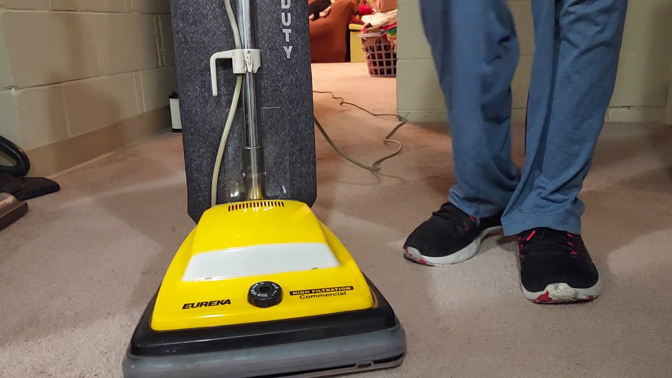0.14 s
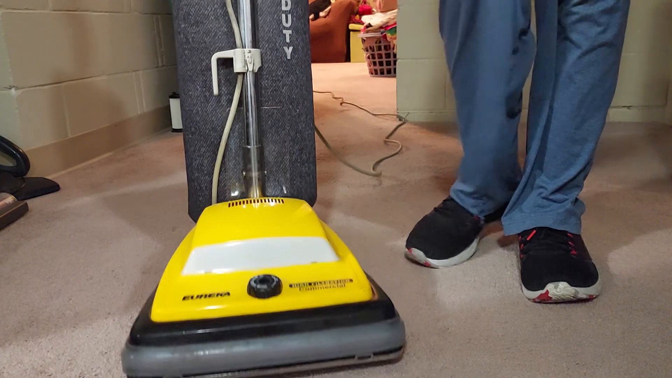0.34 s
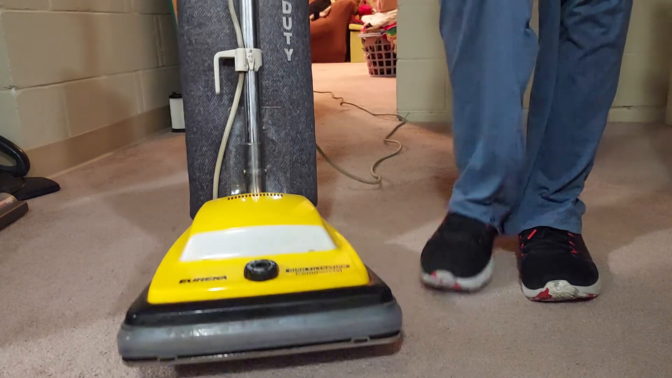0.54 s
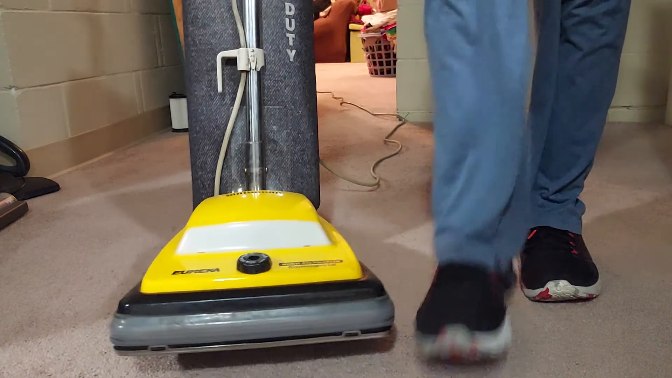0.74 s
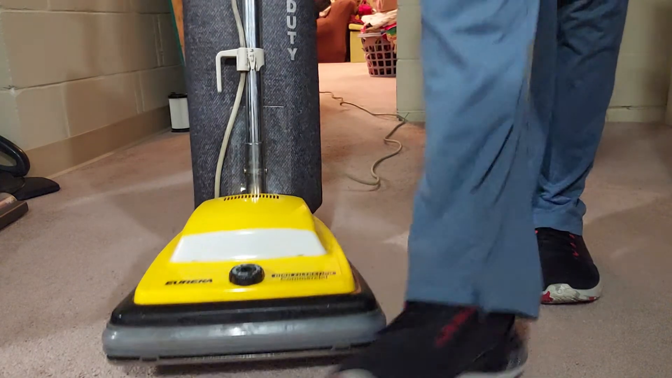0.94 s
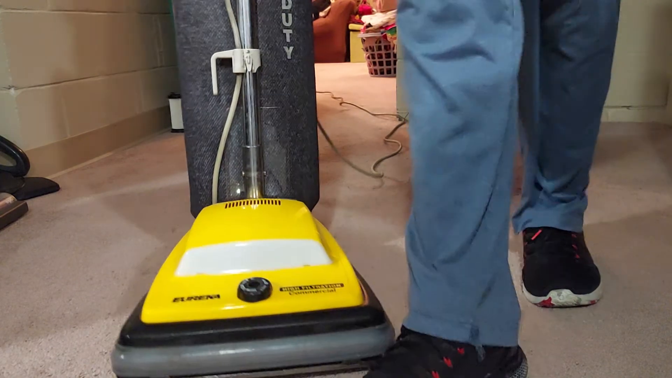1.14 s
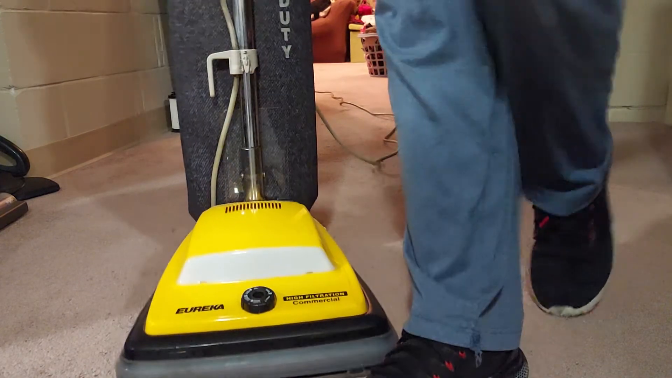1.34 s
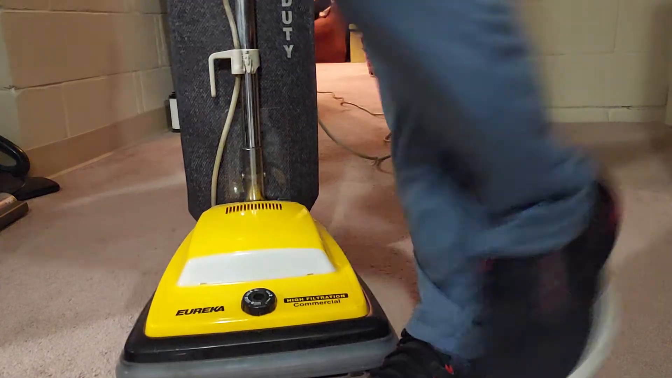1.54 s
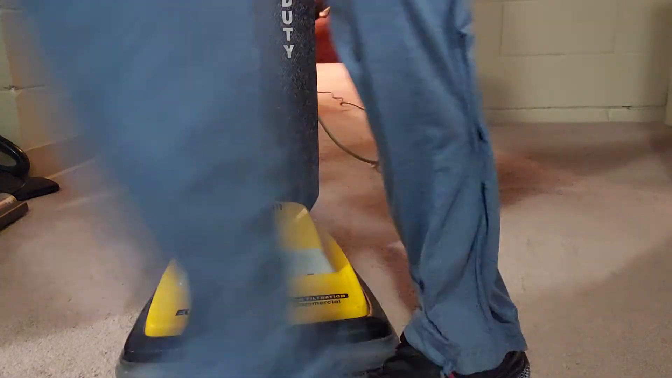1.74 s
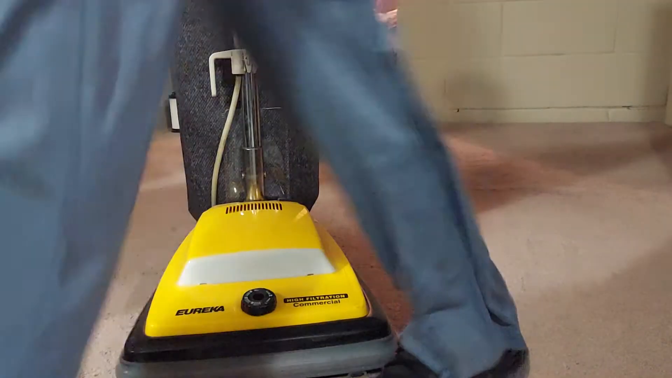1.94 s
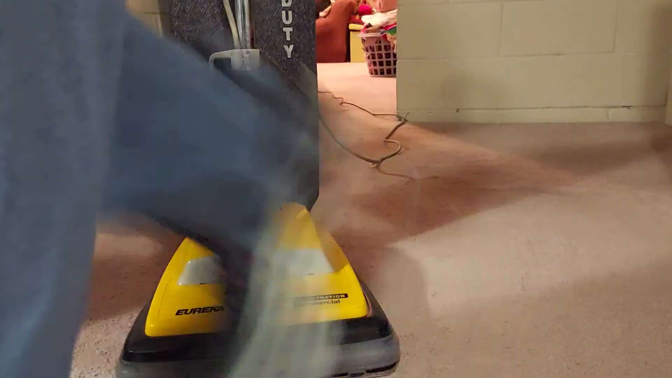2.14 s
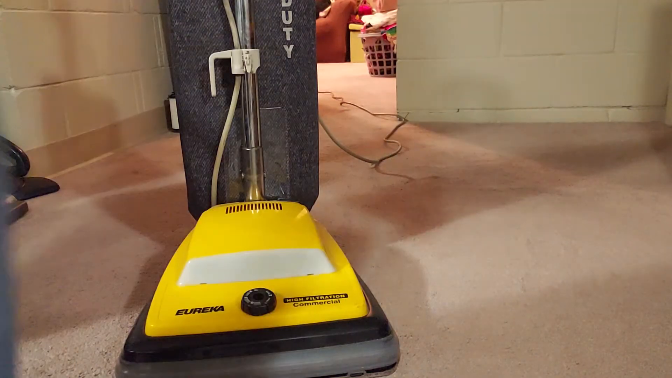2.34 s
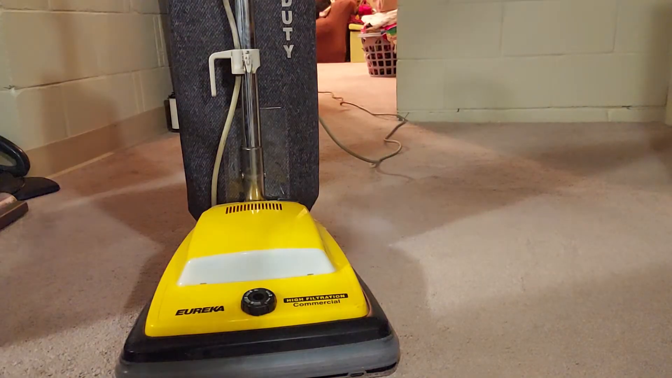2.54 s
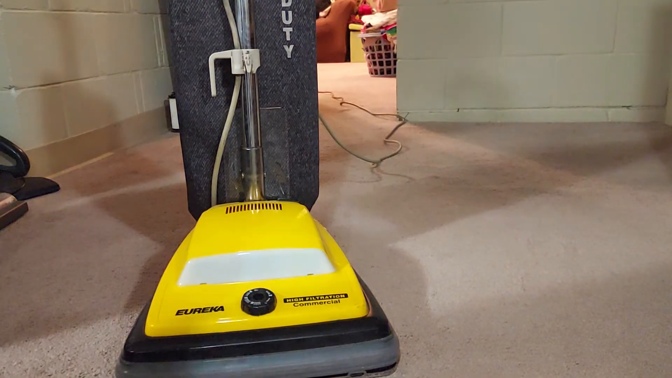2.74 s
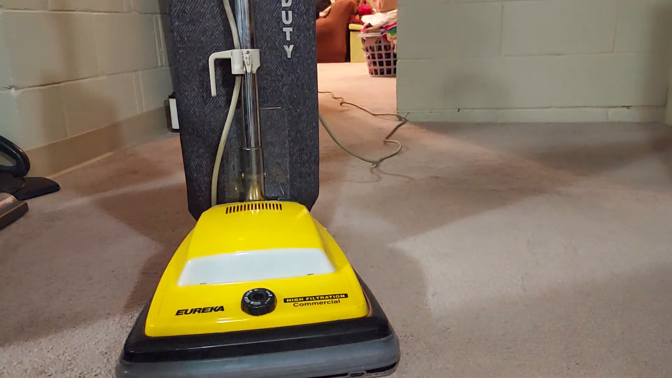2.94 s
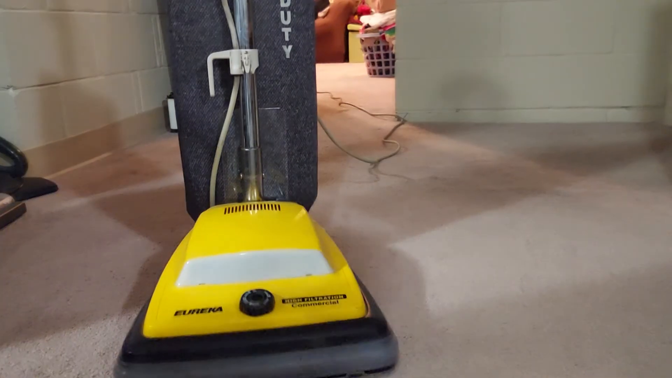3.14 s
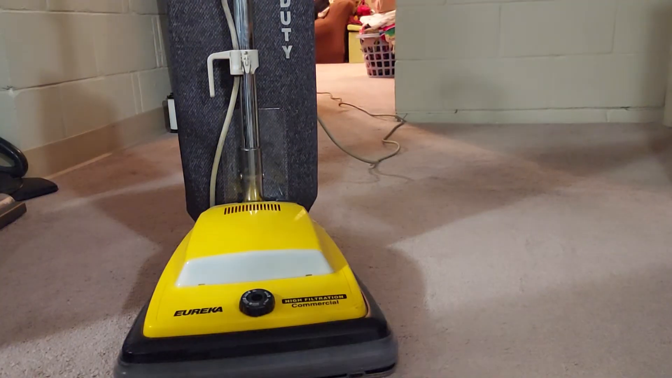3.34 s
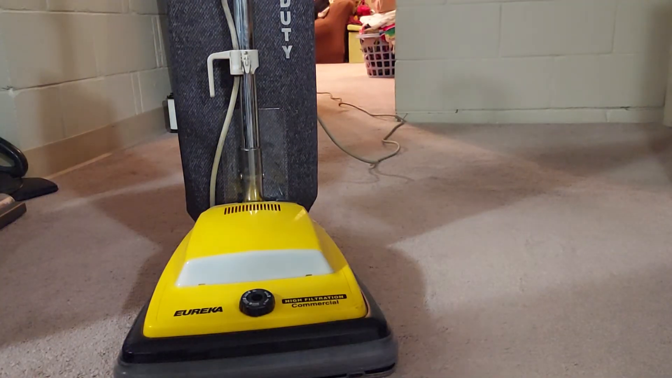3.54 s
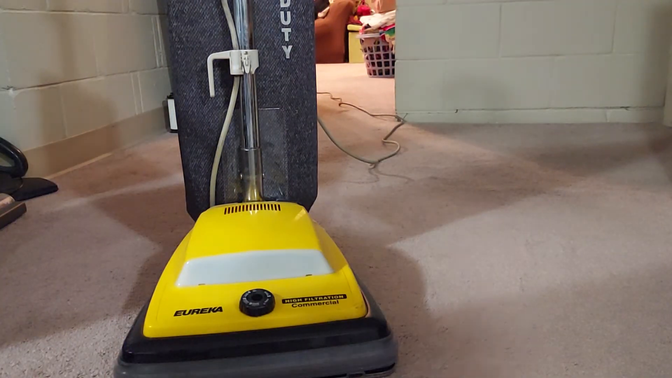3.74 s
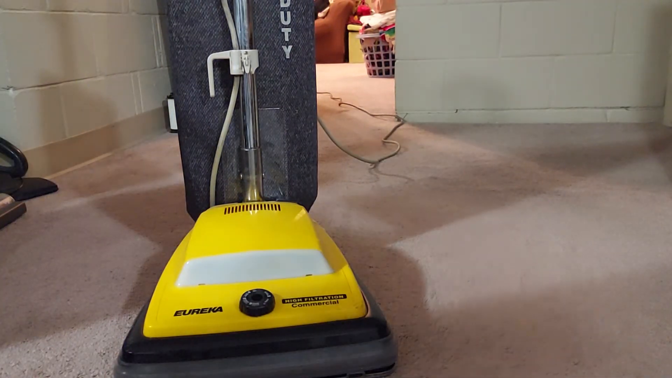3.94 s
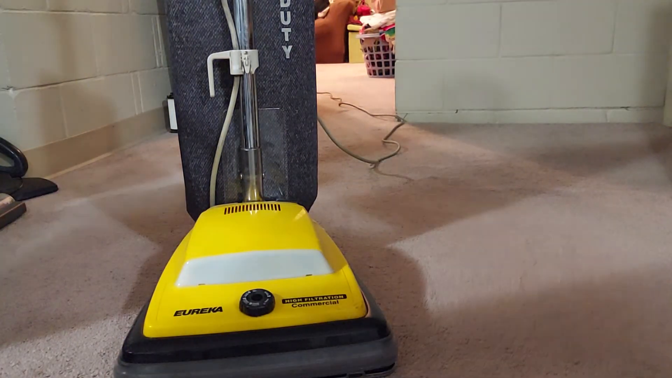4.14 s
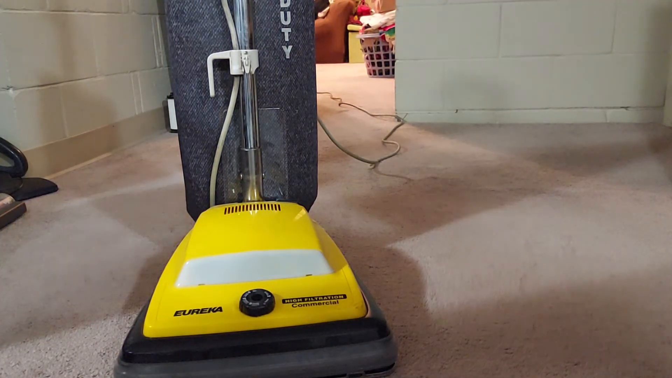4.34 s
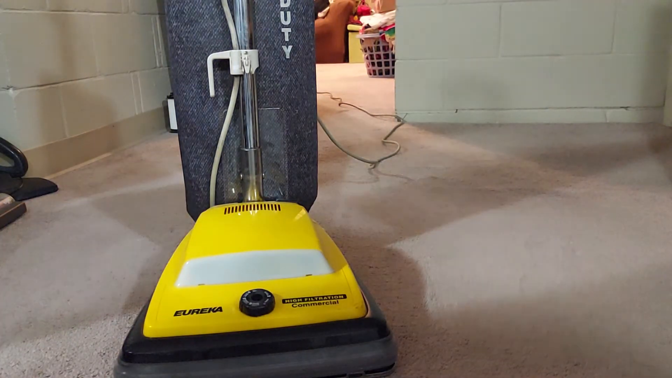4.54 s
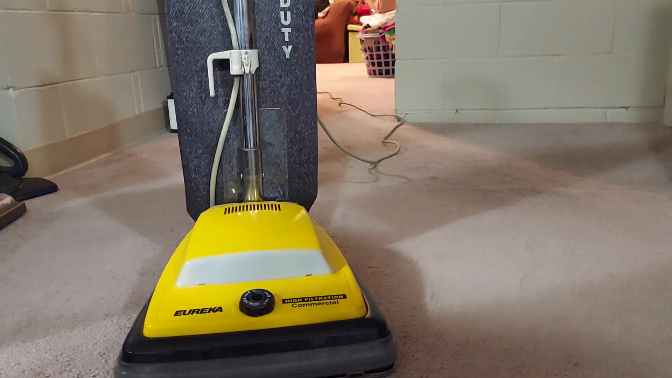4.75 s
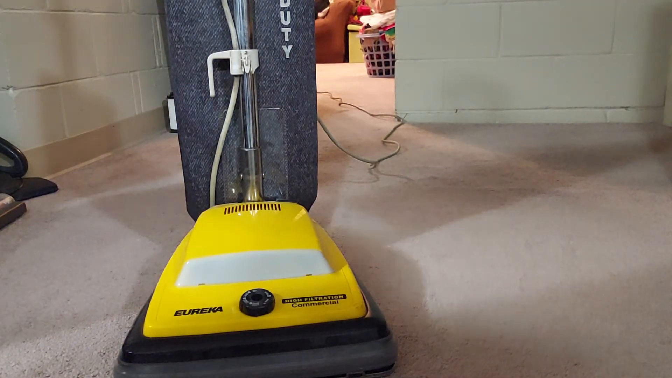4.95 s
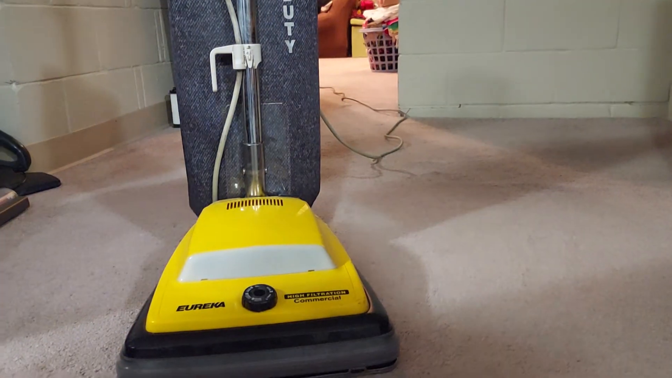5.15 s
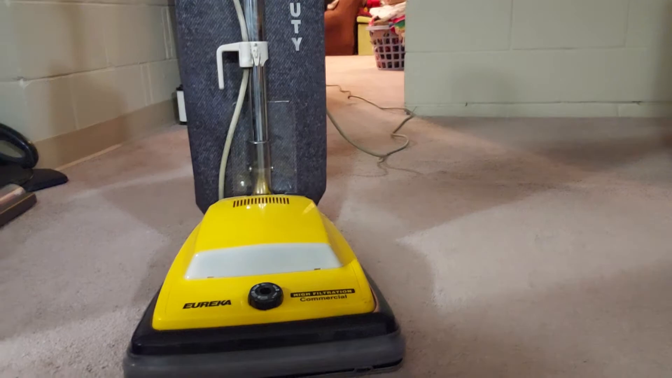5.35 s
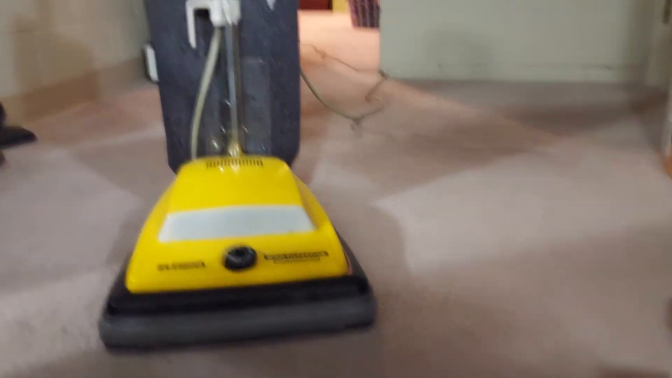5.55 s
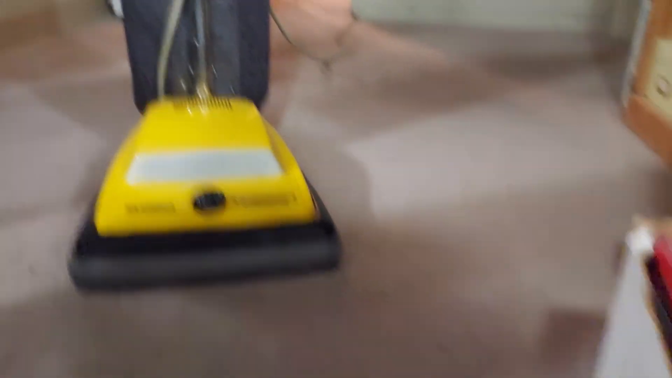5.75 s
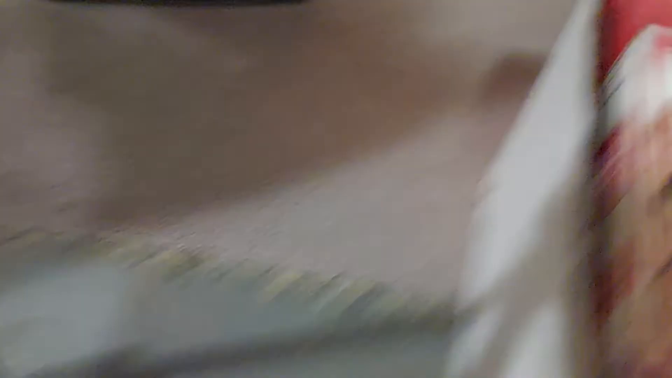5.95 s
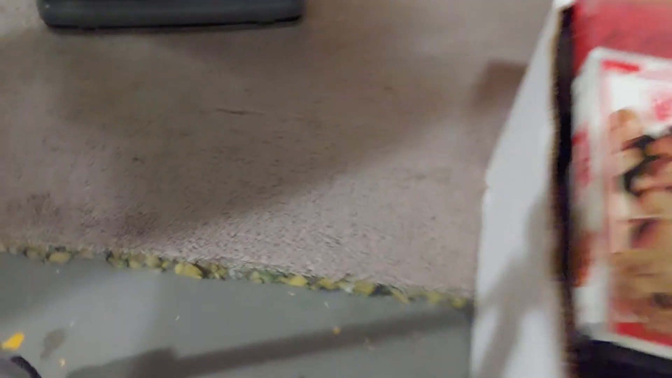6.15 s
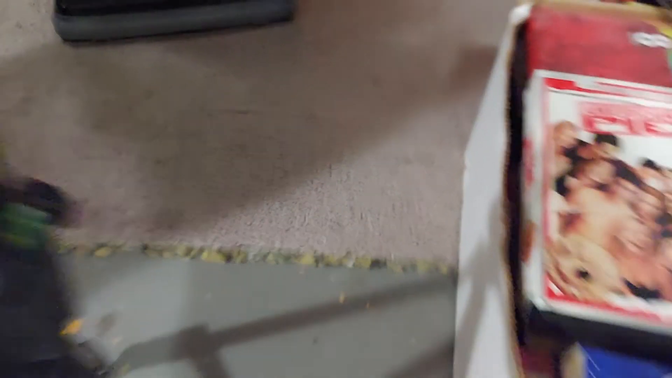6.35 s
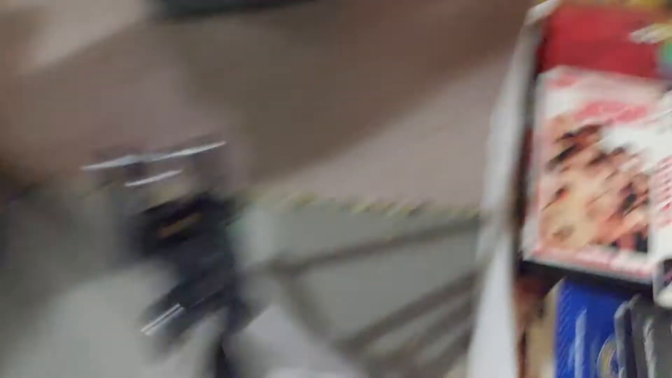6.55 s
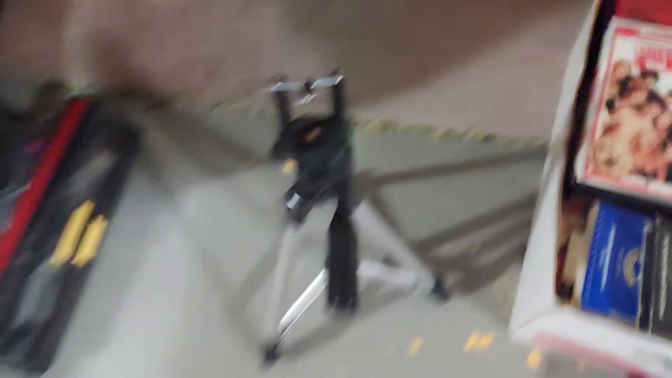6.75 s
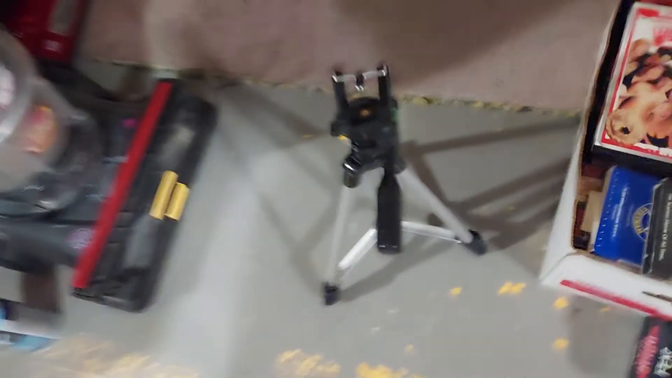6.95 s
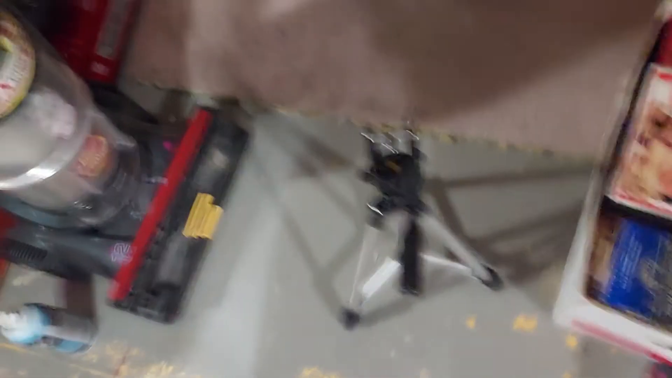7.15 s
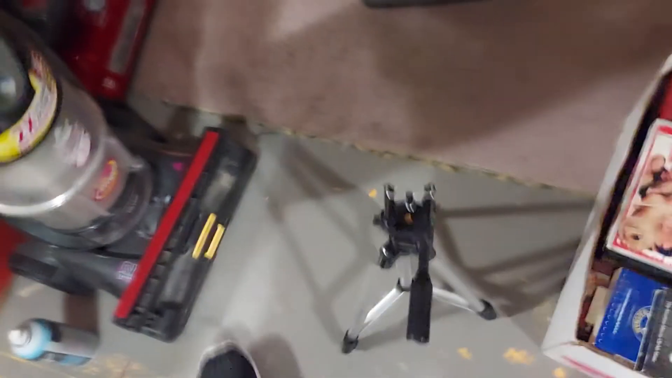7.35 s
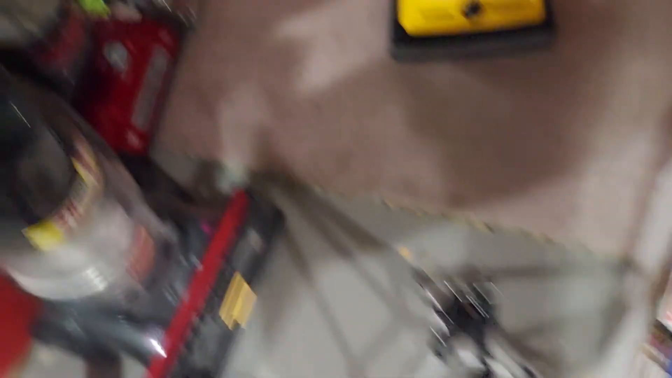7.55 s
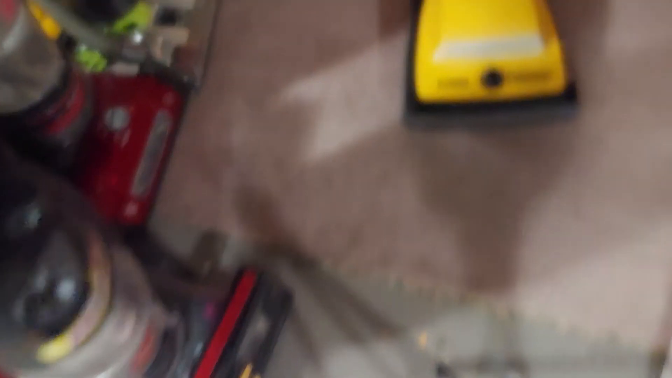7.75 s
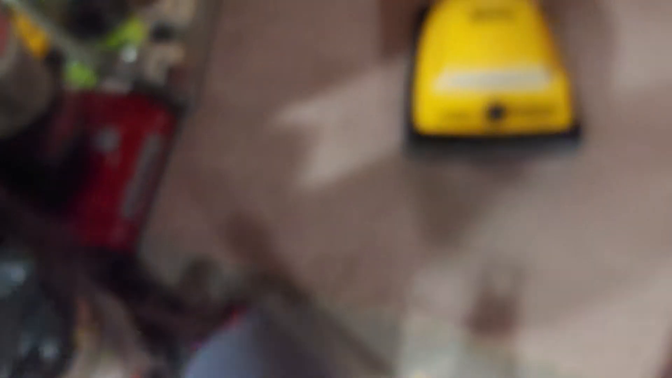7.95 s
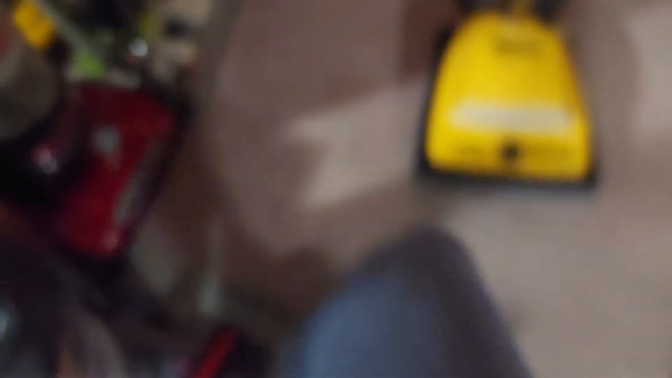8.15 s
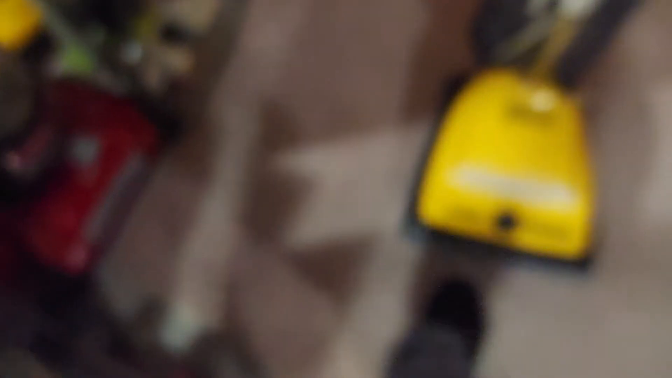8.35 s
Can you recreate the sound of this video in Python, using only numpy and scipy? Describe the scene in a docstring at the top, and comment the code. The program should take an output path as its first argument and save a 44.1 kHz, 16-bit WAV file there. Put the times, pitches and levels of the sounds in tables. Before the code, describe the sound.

An upright vacuum cleaner, just switched off, whines down to silence in a basement; cloth rustles, knocks, then loud clicks and a snap close by.

```python
"""An upright vacuum cleaner, just switched off, spins down: turbulent fan noise and rotor harmonics fall together.
Someone walks round it: clothes rub as swelling noise, and knocks ring damped modes in a basement room.
A phone is then pulled from a spring clamp, whose slips, snaps and scuffs are impulses and scrapes on its modes.
A wavering mains hum, low rumble and soft room noise stay underneath."""
import sys
import numpy as np
from scipy import signal
from scipy.fft import rfft, irfft, next_fast_len
from scipy.io import wavfile

SR = 44100
rng = np.random.default_rng(int(sys.argv[2]) if len(sys.argv) > 2 else 0)


def generate_wav(sig):
    """Save sig (samples, or channels by samples) to the path in sys.argv[1] as 16-bit PCM at SR."""
    pcm = np.round(np.clip(np.atleast_2d(sig).T, -1, 1) * 32767).astype(np.int16)
    wavfile.write(sys.argv[1], SR, pcm)


def voltage_ratio(decibels):
    """Convert decibels (scalar or array-like) to amplitude ratios, 20 dB per decade."""
    exponent = np.asarray(decibels, float) / 20
    return 10 ** exponent


N = 369991

# Modes of things in the room. Each row: frequency in Hz, level in dB before tilt, decay time t60 in seconds.
ROOM_MODES = [(250, -5, 0.051), (520, 9.5, 0.0058), (1150, 0, 0.0011), (2190, -2.5, 0.004),
              (4710, -24, 0.002), (9220, -25, 0.00024)]
# Modes of the phone and its stand. Each row: frequency in Hz, level in dB before tilt, decay time t60 in seconds.
PHONE_MODES = [(125.6, -2, 0.014), (273, 6.5, 0.057), (478.4, 22, 0.0074), (780, 15, 0.0087),
               (1633, 13, 0.0069), (2700, 4, 0.0071), (4000, 1, 0.00073), (7200, -6, 0.001),
               (13860, -20, 0.0006)]
KNOCK_T60_S = 0.047  # decay of the scrape in knocks and bumps
LIFT_S, LIFT_TAKES_S = 6.8, 0.17  # the phone is lifted off its stand


def rms_one(x):
    """Normalise by the root mean square, so that mean power is 1."""
    return x / np.sqrt(np.mean(x ** 2) + 1e-20)


def at_hz(points, hz):
    """Interpolate a spectrum on a logarithmic frequency axis, where octaves are equally spaced."""
    points = np.array(points)
    return np.interp(np.log(hz), np.log(points[:, 0]), points[:, 1])


def sides(pan_db):
    """Pan by level difference (dB, positive to the left): left and right gains whose mean is 1."""
    left = 2 / (1 + voltage_ratio(-np.asarray(pan_db)))
    return np.array([left, 2 - left])


def smooth_rise(at_s, takes_s):
    """Pass from 0 to 1 along a hyperbolic tangent centred on at_s."""
    return (1 + np.tanh((np.arange(N) / SR - at_s) / takes_s)) / 2


def drift(rate_hz):
    """Low-pass noise: two equal poles at rate_hz give a slow random wander of rms 1."""
    pole = np.exp(-80 * np.pi * rate_hz / SR)  # one point every 40 samples
    white = rng.standard_normal(N // 40 + 2002)
    slow = signal.lfilter([1], [1, -2 * pole, pole * pole], white)[2000:]
    return np.interp(np.arange(N) / 40, np.arange(len(slow)), rms_one(slow))


def coloured(spectrum, flicker_db, rate_hz, size=N):
    """Spectral shaping of partly coherent stereo noise, flickering in level about rms 1."""
    # Left-right coherence. Each row: frequency in Hz, left-right correlation (0 to 1).
    likeness = [(60, 0.091), (380, 1), (2380, 0.062), (15000, 0.031)]
    hz = np.maximum(np.fft.rfftfreq(size, 1 / SR), 5)
    mid, side = rfft(rng.standard_normal((2, size)))
    alike = np.clip(at_hz(likeness, hz), 0, 1)
    pair = np.sqrt(1 + alike) * mid + np.sqrt(1 - alike) * side * [[1], [-1]]
    noise = irfft(pair * voltage_ratio(at_hz(spectrum, hz)), size)
    return rms_one(noise * voltage_ratio(flicker_db * drift(rate_hz)[:size]))


def rundown():
    """Deceleration under drag proportional to speed plus constant brush friction: pitch (Hz), airflow level (dB)."""
    start_hz, drag_s, friction_hz = 2440, 2.43, 700  # commutator pitch, drag time constant, friction as a pitch
    air_db, air_power = -38.5, 2.37  # airflow level at the start; its amplitude goes as this power of the speed
    decay = np.exp(-np.arange(N) / SR / drag_s)
    pitch_hz = np.maximum((start_hz + friction_hz) * decay - friction_hz, 1)
    return pitch_hz, air_db + air_power * 20 * np.log10(pitch_hz / start_hz)


def blows(contacts, modes, unlike, top_hz):
    """Modal excitation: a click and a dying, grainy scrape ring damped modes; a brighter tilt keeps more treble."""
    # contacts: start (s), peak (dB), left-right (dB), tilt (dB per octave), scrape t60 (s), perhaps own pitch (Hz)
    out, t = np.zeros((2, N + 8192)), np.arange(8192) / SR
    for start, peak_db, pan_db, tilt_db, t60, *own_hz in contacts:
        grains = voltage_ratio(2.5 * rng.exponential(1, len(t) // 32)).repeat(32)
        scrape = rng.standard_normal((3, len(t))) * grains * voltage_ratio(-60 * t / t60)
        push = scrape[0] + unlike * scrape[1:]  # a shared part and one for each side
        push[:, 0] += 8.0  # the click
        loudest_db = max(db + tilt_db * np.log2(hz / 1000) for hz, db, _ in modes)
        rings = list(modes)
        for hz in own_hz:  # a struck thing adds its own pitch, clearer when the tilt is dull
            rings.append((hz, loudest_db - 0.7 * tilt_db - tilt_db * np.log2(hz / 1000), 18 / hz))
        sound = 0
        for hz, db, ring_s in rings:
            radius, angle = voltage_ratio(-60 / (ring_s * SR)), 2 * np.pi * hz / SR
            rung = signal.lfilter([1, 0, -1], [1, -2 * radius * np.cos(angle), radius * radius], push + 1e-18)
            luck_db = rng.normal(0, 2)
            sound = sound + voltage_ratio(db + luck_db + tilt_db * np.log2(hz / 1000)) * rms_one(rung)
        # the cut moves an octave for 6 dB per octave of tilt
        cut_hz = np.clip(top_hz * 2 ** (tilt_db / 6), 700, 20000)
        sound = signal.lfilter(*signal.butter(2, cut_hz, fs=SR), sound)
        sound = sound / np.abs(sound.mean(axis=0)).max()
        i = round(start * SR)
        out[:, i:i + len(t)] += voltage_ratio(peak_db) * sides([pan_db]) * sound
    return out[:, :N]


def rustle(rubs, treble_db, rate_hz):
    """Stroke-shaped noise: each rub is noise round a broad resonance with a treble hiss, swelling and fading."""
    out = np.zeros((2, N))
    for start, end, db, hz, swell in rubs:
        i, size = round(start * SR), round((end - start) * SR)
        colour = [(hz / 6, -14), (hz / 1.3, -7), (hz, 0), (hz * 1.5, -11), (16000, treble_db)]
        turning = np.clip(swell, 0.05, 0.95)  # share of the stroke before its loudest point
        phase = np.interp(np.arange(size) / size, [0, turning, 1], [0, 0.5, 1])
        stroke = np.sin(np.pi * phase) ** 0.9
        out[:, i:i + size] += voltage_ratio(db) * stroke * coloured(colour, 2.5, rate_hz, size)
    return out


def room(x):
    """Reverberation by recirculation: sixteen feedback delays a side, duller on every round."""
    t60_s, wall_cut_hz = 0.35, 5000  # decay at low frequencies, treble loss per round
    size = next_fast_len(N + SR)
    delay = np.exp(-2j * np.pi * np.fft.rfftfreq(size))  # one sample
    dull = np.exp(-2 * np.pi * wall_cut_hz / SR)
    low_pass = (1 - dull) / (1 - dull * delay)
    echo = np.zeros((2, len(delay)), complex)
    lags = (rng.uniform(0.012, 0.045, 32) * SR).astype(int)
    for k, lag in enumerate(lags):
        loop = voltage_ratio(-60 * lag / SR / t60_s) * low_pass * delay ** lag
        echo[k % 2] += loop / (1 - loop) * (-1) ** (k // 2)
    return irfft(rfft(x.mean(axis=0), size) * echo, size)[:, :N]


def room_tone():
    """Stationary broadband noise of the room, sinking a little as the phone is lifted."""
    # Noise spectrum. Each row: frequency in Hz, relative density in dB per Hz.
    spectrum = [(150, -14), (222, -16), (414, -27), (1390, -39.5), (14000, -33), (16000, -53.5)]
    level_db = -72.8 - 1.8 * smooth_rise(LIFT_S, LIFT_TAKES_S)
    return voltage_ratio(level_db) * coloured(spectrum, flicker_db=1.5, rate_hz=3)


def mains_hum():
    """A periodic source with one overtone at the octave, wavering in phase and level; it sinks at the lift."""
    turns = 2 * np.pi * 120.5 * np.arange(N) / SR + 0.6 * drift(5)
    level_db = -60 - 9.5 * smooth_rise(LIFT_S, LIFT_TAKES_S) + 3.6 * drift(10)
    return voltage_ratio(level_db) * (np.sin(turns) + voltage_ratio(-21.5) * np.sin(2 * turns)) * sides([5.0])


def rumble():
    """Structure-borne low noise: a steady part, motor shake following the airflow, and a swell at each thump."""
    # Rumble spectrum. Each row: frequency in Hz, relative density in dB per Hz.
    spectrum = [(20, -35.5), (57, -4.5), (110, -4), (190, -22), (500, -39.5), (900, -100)]
    # Heavy footfalls and shifts of grip. Each row: start in seconds, level of the swell in dB.
    thumps = [(2.704, -43), (3.427, -51.5), (6.136, -43.5), (6.87, -60.5), (3.087, -51), (7.177, -48),
              (7.479, -45.5)]
    t = np.arange(N) / SR
    motor_db = rundown()[1] - 23
    level = voltage_ratio(-64.5) + voltage_ratio(motor_db)
    for start, db in thumps:
        age = np.clip(t - start, 0, 2) / 0.025  # loudest after 25 ms
        level = level + voltage_ratio(db) * age * np.exp(1 - age)
    return level * sides([7.0]) * coloured(spectrum, flicker_db=2.5, rate_hz=3)


def room_knocks():
    """Impact on resonant bodies: steps and knocks ring the room's things, each with a pitch of its own."""
    # Each row: start in seconds, peak in dB, tilt in dB per octave, own pitch in Hz.
    knocks = [(0.387, -32, -10.5, 615), (1.152, -38.5, -2.5, 685), (1.267, -36.5, -4.5, 305),
              (1.526, -42.5, -6, 257), (1.997, -20, 0.5, 277), (2.5289, -27, 14, 6000),
              (2.661, -27, -7, 1880), (2.726, -34.5, -7.5, 278), (3.429, -38.5, 8.5, 322),
              (3.569, -36, 9.5, 256), (3.986, -44, -2.5, 389), (4.028, -36, 9.5, 2450),
              (4.101, -39.5, -4.5, 250)]
    contacts = [(s, db, 5.5, tilt_db, KNOCK_T60_S, hz) for s, db, tilt_db, hz in knocks]
    return blows(contacts, ROOM_MODES, unlike=0.83, top_hz=8380)


def stand_bumps():
    """Impact close by, with little reverberation: a foot catches the phone's stand."""
    # Each row: start in seconds, peak in dB, tilt in dB per octave, own pitch in Hz.
    bumps = [(3.077, -30, 3.5, 6860), (3.093, -30.5, -10, 490)]
    contacts = [(s, db, -1.5, tilt_db, KNOCK_T60_S, hz) for s, db, tilt_db, hz in bumps]
    return blows(contacts, ROOM_MODES, unlike=1.0, top_hz=13000)


def clothes():
    """Friction of cloth: bright, hissy rubs with the strides."""
    # Each row: start in seconds, end in seconds, level in dB, resonance in Hz.
    rubs = [(1.284, 2.061, -59.5, 3420), (2.041, 2.54, -66.5, 9600), (2.451, 2.604, -63, 2180),
            (2.595, 2.961, -60.5, 4000), (3.397, 4.024, -63, 4000), (3.952, 4.618, -59, 4570),
            (3.979, 4.443, -61, 1900), (4.506, 4.764, -59.5, 1660), (6.391, 6.635, -72.5, 1848),
            (7.175, 7.28, -57.5, 990), (7.577, 7.911, -62, 1190), (8.082, 8.387, -69, 2700)]
    return rustle([(*rub, 0.23) for rub in rubs], treble_db=-7.5, rate_hz=19.5)


def drags_and_snap_tail():
    """Dull noise with a weak treble: sliding friction of fingers and clamp on the phone, and a snap's dying tail."""
    # Each row: start in seconds, end in seconds, level in dB, resonance in Hz, share of the time spent
    # swelling (held within 0.05 to 0.95). The rows at 5.95 and 6.06 are the dying tail of the snap.
    drags = [(5.14, 5.375, -62.5, 1840, 0.81), (5.47, 5.76, -58, 730, 0.045), (5.75, 5.97, -43.5, 666, 1),
             (5.95, 6.068, -47, 2700, 0.1), (6.06, 6.346, -68.5, 2060, 0.1), (7.34, 7.5, -55.5, 386, 0.82),
             (7.49, 7.64, -53, 280, 0.12), (7.938, 8.008, -50.5, 1500, 1)]
    return rustle(drags, treble_db=-32.5, rate_hz=72)


def phone_touches():
    """Structure-borne impact: bumps, snaps and scuffs ring the modes of the phone and its stand."""
    # Each row: start in seconds, peak in dB, left-right difference in dB, tilt in dB per octave,
    # scrape decay t60 in seconds.
    touches = [(4.046, -28, 3, 7, 0.007), (5.6395, -22, -1, -13, 0.0034), (5.942, -5, -0.5, -4.5, 0.019),
               (5.955, -13, -6, 3, 0.017), (5.959, -14, 24, 11.5, 0.097), (5.970, -12.5, 14, 7, 0.02),
               (5.978, -22.5, 24, 4.5, 0.026), (6.072, -29, 8, 6.5, 0.099), (6.138, -30.5, 6, 5, 0.058),
               (6.176, -39.5, 2, 4.5, 0.086), (6.249, -42.5, 5.5, 5, 0.17), (6.665, -22, -6, -17, 0.0041),
               (7.213, -31.5, 5.5, -25, 0.036), (7.501, -24.5, 1.5, -6.5, 0.014),
               (7.929, -25, -6, 6.5, 0.0077), (7.979, -38.5, -6, 0.5, 0.042),
               (8.004, -26, -4, -5.5, 0.0023), (8.085, -40, 18, -13, 0.0025)]
    return blows(touches, PHONE_MODES, unlike=1.7, top_hz=59300)


def clamp_slips():
    """Stick-slip: the clamp slips along the phone tick by tick, louder ticks a little duller."""
    # Each row: start in seconds, peak in dB.
    slips = [(5.398, -41), (5.405, -32), (5.428, -32), (5.481, -22.5), (5.491, -27), (5.504, -41),
             (5.514, -24), (5.534, -15.5), (5.541, -31), (5.543, -34), (5.584, -18.5), (5.598, -16),
             (5.615, -12), (5.636, -9), (5.663, -8.5), (5.689, -10.5), (5.708, -34.5), (5.742, -9.5)]
    contacts = []
    for start, peak_db in slips:
        tilt_db = 2 - 0.043 * (peak_db + 16.5)  # dB per octave
        contacts.append((start, peak_db, -14.5, tilt_db, 0.004))
    return blows(contacts, PHONE_MODES, unlike=0.87, top_hz=30000)


def vacuum():
    """Turbulence and rotor tones: fan air through housing resonances, harmonics gliding down with the speed."""
    # Fan air spectrum. Each row: frequency in Hz, relative density in dB per Hz.
    airflow = [(35, -12), (60, -29.5), (250, 0), (330, -8), (666, -13), (1380, -17.5), (16000, -41.5)]
    # Housing resonances. Each row: frequency in Hz, width in Hz (15 at least), mean level in dB against the air.
    housing = [(256, 13, -2.5), (1741, 98, -11.5), (3254, 220, -17), (5200, 450, -20.5)]
    # Strength of a harmonic. Each row: its pitch in Hz, level in dB against the airflow before the order loss.
    radiation = [(450, -22), (650, -14), (800, -19), (2400, -17), (3300, -16.5), (4800, -21), (6000, -23),
                 (8500, -38), (14000, -24), (15500, -11)]
    bars, blades = 22, 7  # commutator bars and fan blades on the shaft
    size = round(2.1 * SR)
    pitch_hz, air_db = (curve[:size] for curve in rundown())

    air = coloured(airflow, flicker_db=0.93, rate_hz=20, size=size)
    white = rng.standard_normal((2, size))
    for hz, width_hz, db in housing:
        ringing = signal.lfilter(*signal.iirpeak(hz, hz / max(width_hz, 15), SR), white)
        air = air + voltage_ratio(db + 2 * drift(20)[:size]) * rms_one(ringing)
    turns = 2 * np.pi * np.cumsum(pitch_hz * (1 + 0.003 * drift(26)[:size])) / SR
    air = air * (1 + 0.4 * np.sin(turns / bars))  # the unbalanced rotor throbs once a turn

    whine = 0
    for order in [blades / bars, 2, 3, *range(5, 12)]:  # fan blades, then commutator
        hz = order * pitch_hz
        in_band = np.clip((16000 - hz) / 300, 0, 1)  # faded out towards 16 kHz, the upper limit of the output
        loss_db = 2 * max(order - 2, 0)
        level_db = at_hz(radiation, hz) - loss_db + 4.5 * drift(12)[:size]
        whine = whine + in_band * voltage_ratio(level_db) * np.sin(order * turns + rng.uniform(0, 1, (2, 1)))
    whine = whine * (1 - smooth_rise(1.35, 0.21))[:size]  # the whine dies before the air

    fade = np.minimum(1, (size - np.arange(size)) / (0.2 * SR))
    machine = (rms_one(air) + whine) * voltage_ratio(air_db) * fade
    return np.pad(machine, ((0, 0), (0, N - size)))


def scene():
    """Superposition of direct and reverberant sound: room knocks are wet, contacts on the phone nearly dry."""
    knocks = room_knocks()
    bumps = stand_bumps()
    phone = clamp_slips() + phone_touches()
    around = (vacuum() + clothes() + drags_and_snap_tail()) * sides([3.0])
    reverberant = room(voltage_ratio(-12.5) * knocks + voltage_ratio(-29.5) * bumps + voltage_ratio(-44.5) * phone)
    return around + mains_hum() + rumble() + room_tone() + knocks + phone + bumps + reverberant


def band_limit(x):
    """A steep low-pass at the top of the band."""
    return signal.sosfilt(signal.butter(12, 17000, fs=SR, output="sos"), x)


def record(dry):
    """Linear filtering, with a dip, a treble resonance and a band limit, then saturation that rounds the peaks."""
    # Overall response: the microphone port's dip and treble resonance, and a band limit above 15.7 kHz that
    # is not the microphone's. Each row: frequency in Hz, gain in dB.
    response = [(7000, 2.5), (7800, -6.5), (10000, -2.5), (13000, 4.5), (15700, 1.5), (16100, -35.5)]
    hz = np.maximum(np.fft.rfftfreq(N, 1 / SR), 5)
    filtered = irfft(rfft(dry) * voltage_ratio(at_hz(response, hz)), N)
    return band_limit(np.tanh(filtered))


dry = scene()
out = record(dry)
generate_wav(out)
```